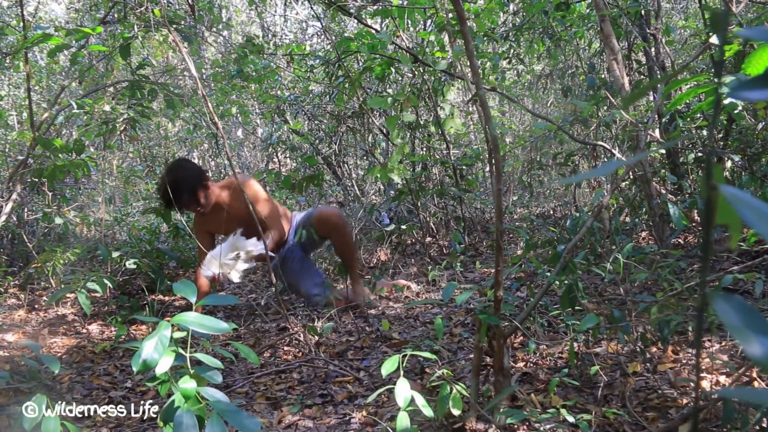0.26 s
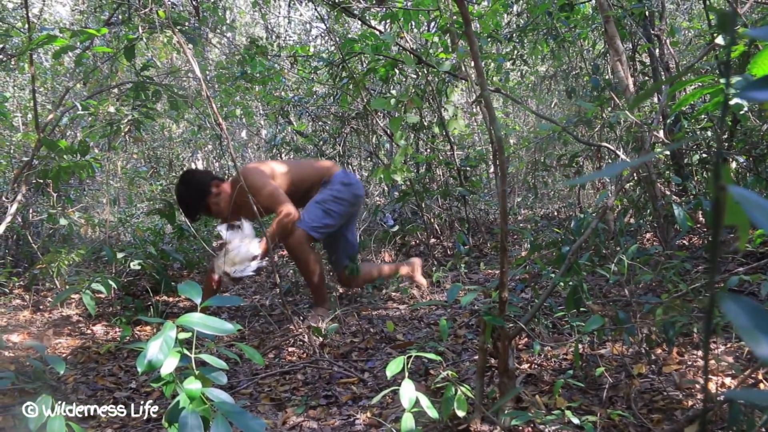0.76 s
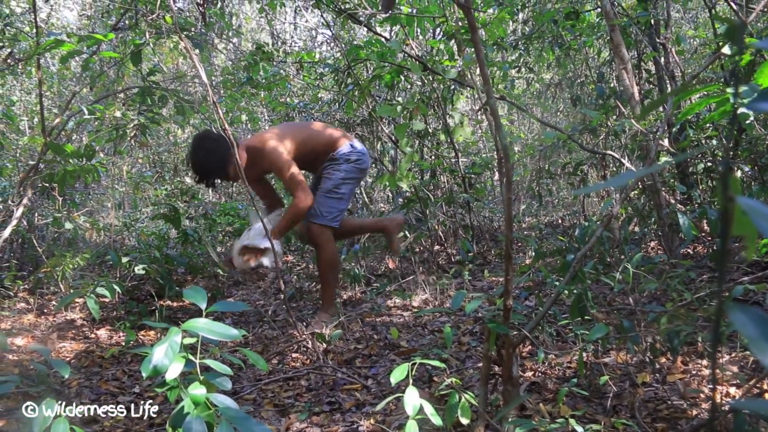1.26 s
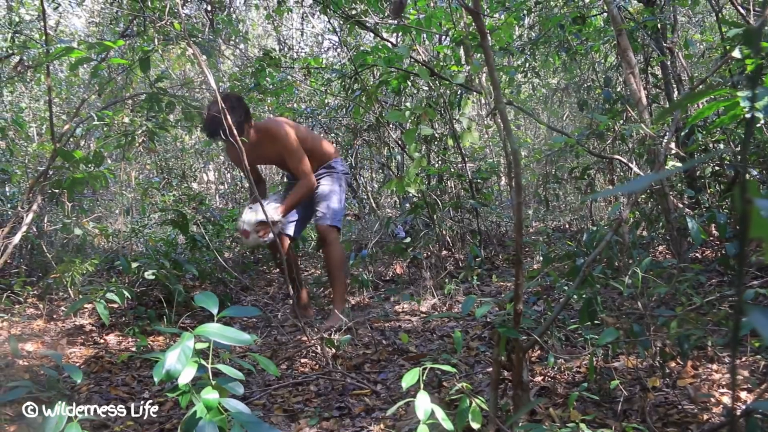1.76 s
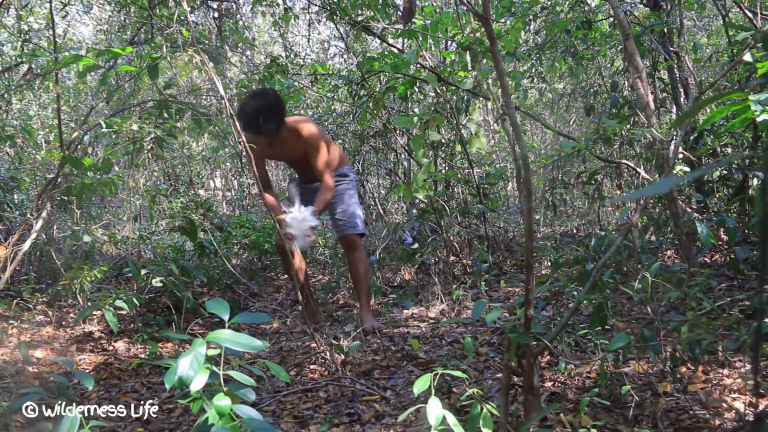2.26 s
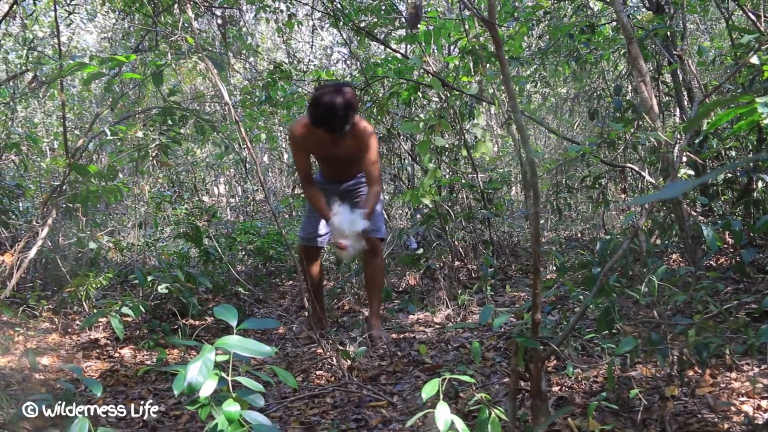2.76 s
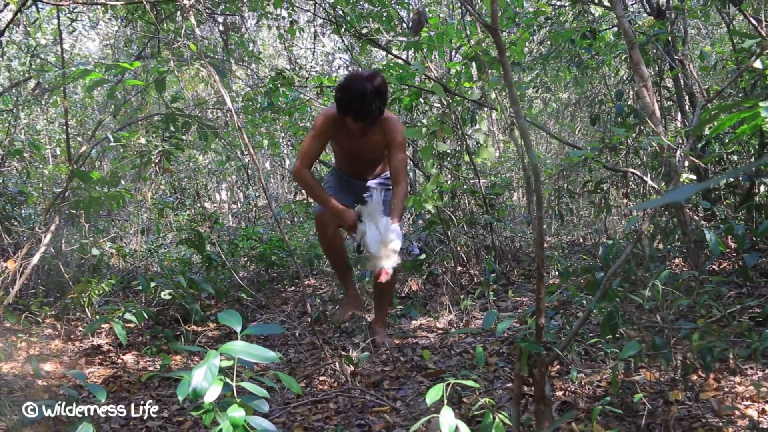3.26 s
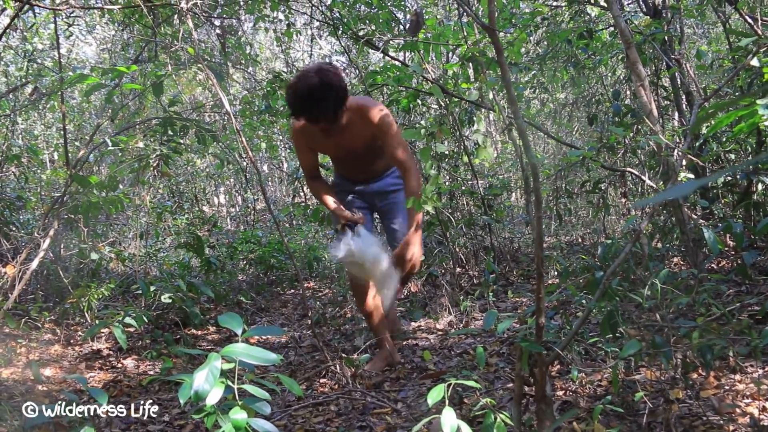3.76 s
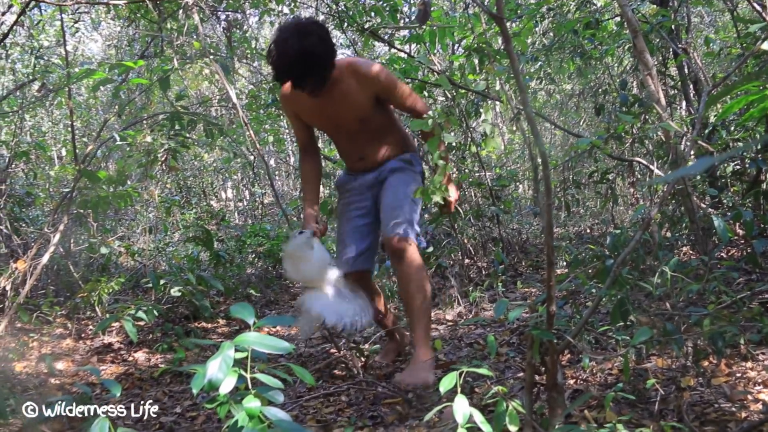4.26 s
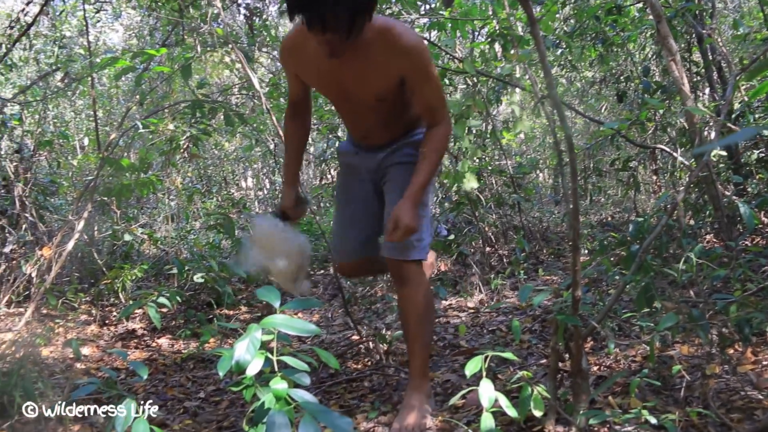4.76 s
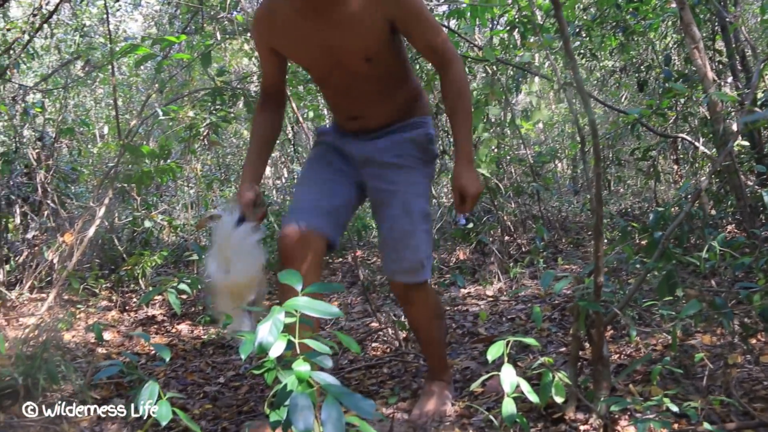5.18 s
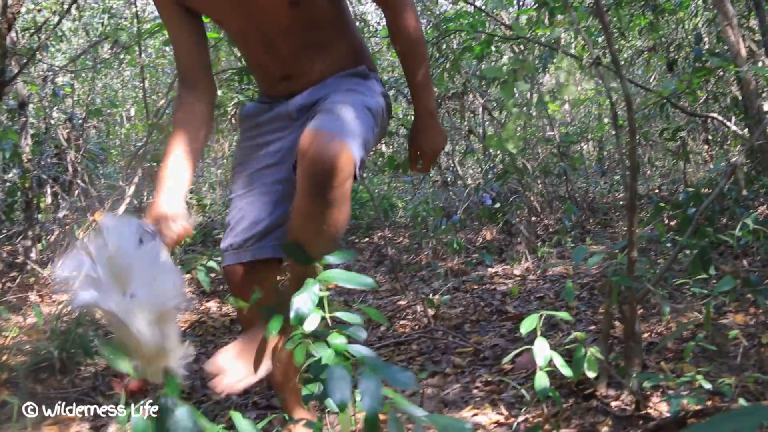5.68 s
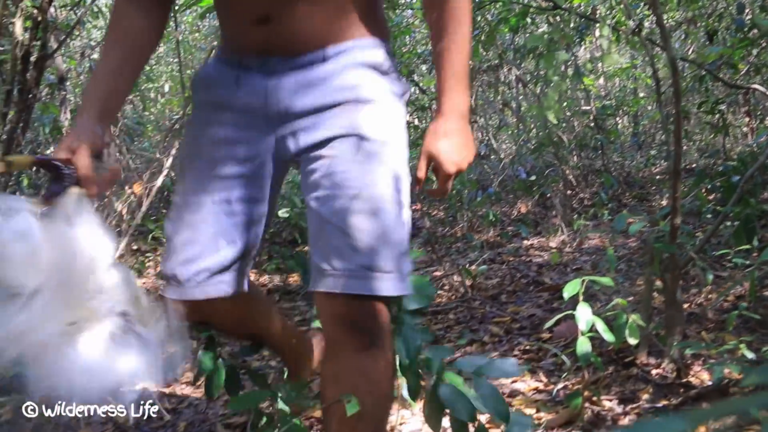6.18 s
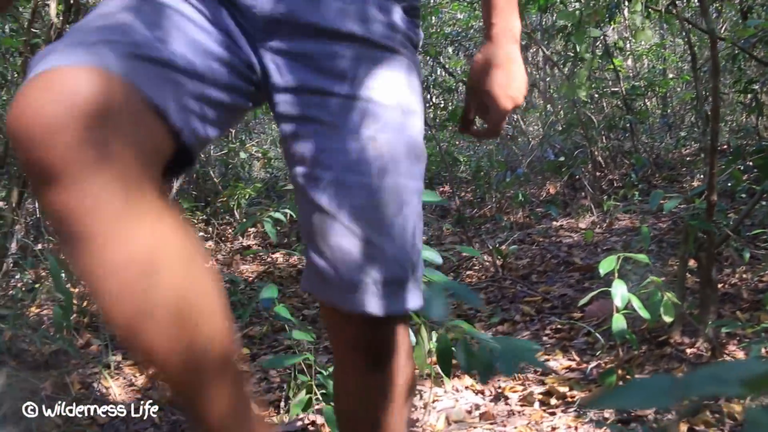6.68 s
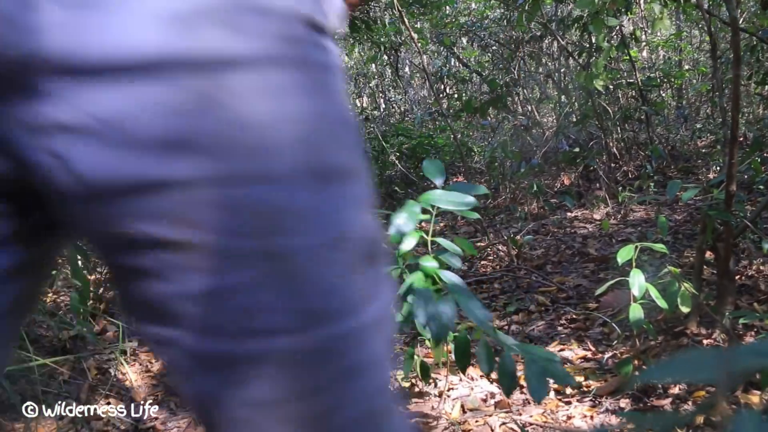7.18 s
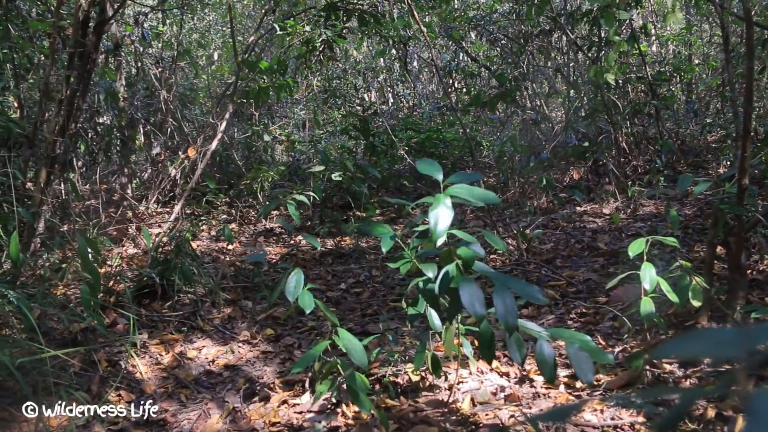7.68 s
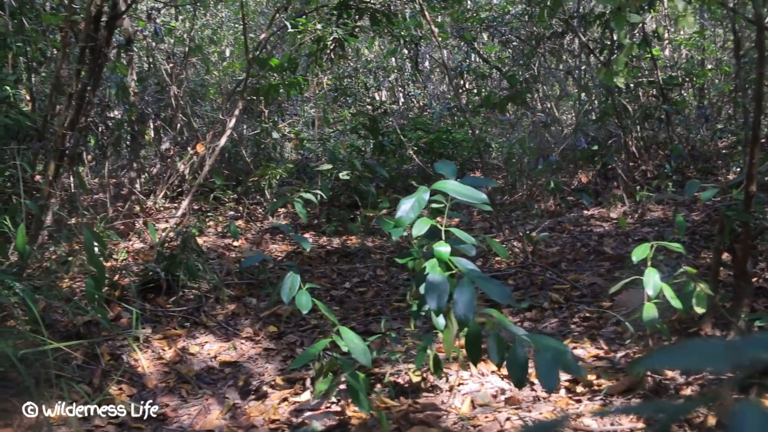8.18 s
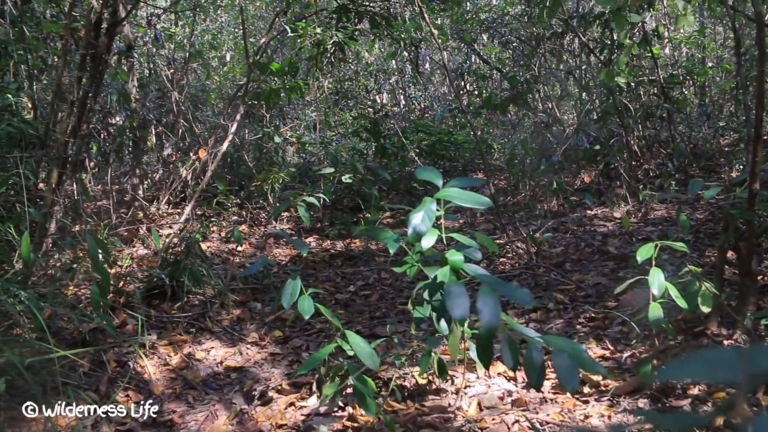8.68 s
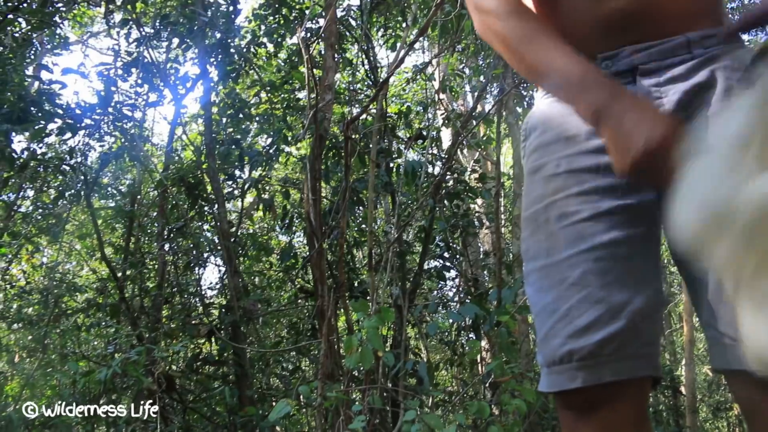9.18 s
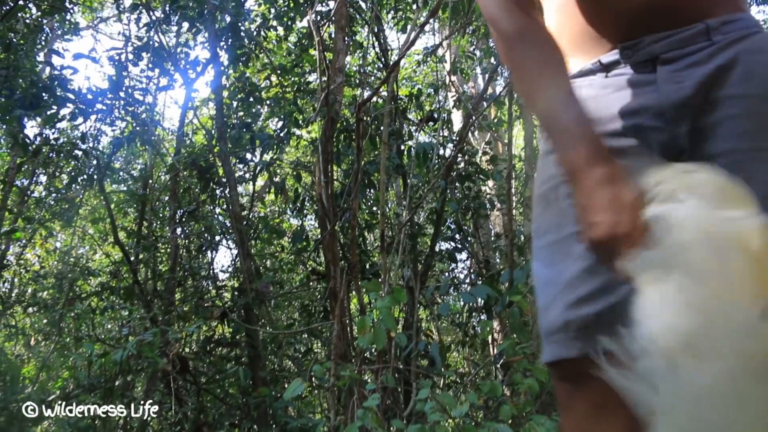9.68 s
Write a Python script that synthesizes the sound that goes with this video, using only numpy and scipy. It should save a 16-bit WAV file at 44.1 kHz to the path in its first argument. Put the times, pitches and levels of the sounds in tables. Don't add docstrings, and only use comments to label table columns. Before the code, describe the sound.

Crackling leaf litter and snapping twigs, a few faint short hen clucks, footsteps passing close, one sharp squawk, then dull thuds and quieter steps.

```python
import sys
import numpy as np
from scipy import signal
from scipy.fft import rfft, irfft, next_fast_len
from scipy.io import wavfile
from scipy.ndimage import uniform_filter1d, map_coordinates

SR = 44100
rng = np.random.default_rng(int(sys.argv[2]) if len(sys.argv) > 2 else 0)


def linear_from_db(decibels):
    return 10 ** (np.asarray(decibels, float) / 20)


def transcribe(signal):
    frames = np.atleast_2d(signal).T
    limited = np.clip(frames, -1, 1)
    pcm = np.round(limited * 32767).astype(np.int16)
    wavfile.write(sys.argv[1], SR, pcm)


N = 438354

# (start [s], length [s], peak level [dB], first pitch [Hz], last pitch [Hz])
CLUCKS = [
    (1.6085, 0.014, -30.5, 363, 355),
    (1.6765, .031, -29.5, 432, 322),
    (2.2526, 0.0375, -25.5, 372, 350),
    (3.2668, 0.04, -26.5, 448, 468),
    (4.577, .057, -24, 348, 318),
]
# (pitch arch [share], moment of peak [0-1], sag [dB],
# first beak tilt [dB/octave], last beak tilt [dB/octave])
CLUCK_MANNER = [(0, .35, 2, 2, 5), (0, .64, 5, -24, 22), (.18, .44, 2.5, 2, 2), (.025, .36, 16, -14, 16),
                (.15, .46, 7, -15, 10)]
# (time [s], pitch [Hz], level [dB], beak tilt [dB/octave])
SQUAWK = [
    (7.0075, 375, -15, 8),
    (7.014, 400, -13, 10),
    (7.0164, 430, -22, 10),
    (7.0182, 522, -8, -8),
    (7.024, 535, -5.8, -20),
    (7.037, 545, -9, -13),
    (7.046, 543, -9, 9),
    (7.0605, 518, -11, 20),
    (7.0725, 375, -26, 14),
]
# (frequency [Hz], level [dB])
THROAT = [
    [(300, -15), (750, -10), (1100, -12), (1440, 0), (1850, -16), (2550, -14), (3200, -24), (3650, -20),
     (5000, -45)],
    [(300, -21), (720, -11), (1070, -6), (1400, 4), (1560, -15), (1720, -8), (2100, -30), (3500, -45)],
    [(300, -17), (820, -1), (1250, 0), (1600, -2), (2050, 0), (2400, -10), (2850, -13), (3450, -13),
     (3950, -36), (4600, -15), (5700, -20), (7000, -38)],
    [(300, -20), (470, -12), (930, -6), (1410, 2), (1880, -13), (2350, -13), (2820, -15), (3300, -42),
     (5000, -50)],
    [(370, -26), (750, -23), (1120, 0), (1500, -18), (1800, -9), (1980, -20), (2250, -12), (2650, -2),
     (3000, -22), (3450, -16), (3800, -30), (4100, -25), (6500, -38)],
    [(380, -20), (540, -12.5), (800, -13), (1080, 0), (1250, -2), (1620, -16), (1900, -32), (2160, -23),
     (2450, -34), (2700, -36), (3240, -29), (4200, -45), (4860, -31), (5400, -52)],
]
RASP = [.25, .2, .27, .2, .17, .03]
DULLING = [1.7, 1.7, 1.7, 1.7, 1.7, .3]
HEN_PAN = [-1.7, -1, -1.5, -3.5, -1.5, -2.9]
HEN_TURN = [0, .1, .1, -.3, .35, .68]
HEN_ECHO = [-16, -13, -11.5, -16, -17.5, -15.5]
# (time [s], peak level [dB], centre frequency
# [Hz])
SNAPS = [(0.069, -31, 2600), (0.086, -28.5, 3280), (0.35, -29, 4450), (0.384, -30.5, 4570),
         (0.462, -29.5, 2000), (0.512, -27, 2700), (0.56, -36, 2010), (0.995, -30.5, 2800),
         (1.069, -33.5, 2790), (1.543, -31, 2970), (2.07, -25.5, 7540), (3.085, -32, 1540),
         (3.387, -42, 3440), (3.533, -27.5, 9000), (3.624, -22, 3510), (3.633, -32, 864),
         (3.749, -34, 4260), (4.504, -19.5, 3080), (4.525, -31.5, 790), (4.962, -51, 870),
         (5.429, -23, 6700), (5.476, -25.5, 7250), (5.645, -38.5, 8000), (5.652, -31.5, 5500),
         (5.704, -25, 855), (5.73, -28.5, 10200), (5.762, -29.5, 7130), (5.782, -29, 11020),
         (5.822, -24, 5600), (5.885, -34, 7340), (5.902, -35.5, 8000),
         (5.925, -30.5, 7560), (6.01, -36, 4000), (6.049, -20, 6300), (6.098, -23.5, 1930),
              (6.21, -36, 993), (6.83, -29, 1400), (6.762, -38.5, 2850), (6.786, -20, 2280),
              (6.808, -29.5, 800), (6.865, -29.5, 3280), (6.944, -26, 1860), (7.092, -20, 700),
              (7.149, -24, 2070), (7.183, -26, 1100), (7.208, -23, 2390), (7.276, -23.5, 4560),
              (7.276, -27.5, 800), (7.45, -36.5, 2140), (7.471, -25, 1800), (7.655, -22, 2530),
              (7.88, -23.5, 2570), (7.983, -23.5, 2400), (8.045, -33.5, 1200), (8.107, -25, 4670),
              (8.143, -31.5, 1700), (8.676, -30, 2300), (8.455, -31, 2890), (8.977, -37, 1324),
              (9.184, -31, 1700), (9.238, -29.5, 1340), (9.381, -34.5, 1900), (9.725, -39, 1500),
              (9.75, -41, 1850), (9.815, -36, 1900), (9.839, -32, 1790), (9.924, -43, 2800),
         (3.501, -38.5, 2770), (3.635, -24.5, 3200), (3.689, -34, 3000), (3.841, -43.5, 4770),
         (3.923, -40, 2090), (4.028, -37, 1650), (4.137, -37.5, 2680), (4.211, -34, 2550),
         (4.295, -34.5, 4840), (4.323, -35.5, 4990), (4.348, -38, 2220), (4.373, -33, 5390),
         (4.419, -31, 3420), (4.558, -32, 3420), (4.812, -39.5, 5500), (4.851, -38, 4390),
         (4.941, -34.5, 4130), (5.291, -35, 4060), (5.31, -33.5, 5240), (5.515, -37, 2140),
         (5.949, -35, 4780), (6.15, -29, 4000), (6.197, -33.5, 2600), (6.372, -37, 3310),
         (6.41, -35.5, 4000), (6.441, -39, 2100), (6.494, -35, 3240), (6.516, -36.5, 2910),
         (6.668, -31.5, 2100), (6.723, -37, 4550), (6.731, -37, 4600), (6.787, -26, 4490),
         (7.093, -19, 6700), (7.108, -19, 5500), (7.151, -24.5, 4500), (7.211, -23.5, 4000),
              (7.39, -39, 3810), (7.431, -36, 5060), (7.494, -33.5, 2230), (7.551, -35.5, 8980),
              (7.571, -33.5, 1500), (7.711, -34, 2520), (7.73, -31.5, 4520), (7.743, -28, 4090),
              (7.778, -21, 4550), (7.819, -29, 2760), (7.936, -36, 2870), (8.045, -29, 6000),
              (8.075, -30, 6420), (8.152, -26, 5700), (8.252, -33.5, 4510), (8.281, -32, 2240),
              (8.416, -39, 2110), (8.835, -30.5, 5000)]
# (time [s], peak level [dB],
# frequency [Hz], rise [s], crunch level [dB])
THUDS = [(4.163, -50.5, 310, 0.0047, -2), (4.219, -46, 180, 0.0025, 2.5), (4.954, -51.5, 162, 0.0083, 2),
         (5.699, -36.5, 180, 0.0028, -16), (6.285, -40.5, 503, 0.0037, -10), (6.589, -52, 420, 0.0052, 5),
         (8.006, -36, 264, 0.0033, -3.5), (8.176, -25, 287, 0.0038, -6.5), (8.268, -34.5, 410, 0.0038, -14),
         (8.375, -38.5, 437, 0.0051, -4.5), (8.521, -47.5, 436, 0.0066, 1), (8.557, -40, 433, 0.0046, -3),
         (8.719, -40.5, 786, 0.0034, -1.5), (8.752, -37, 428, 0.0025, -10), (9.237, -27.5, 201, 0.002, -12),
         (9.864, -31.5, 258, 0.0018, -11),
         (1.589, -46, 517, 0.0021, -8), (1.785, -40, 1014, 0.0035, -28), (2.071, -41.5, 920, 0.0031, -21),
        (2.73, -52, 1000, .004, -25), (4.793, -50, 860, 0.0047, -2.5), (4.846, -43.5, 740, 0.0018, -7.5),
        (6.787, -18, 732, 0.0013, -15), (7.399, -39, 880, 0.0025, -11), (8.634, -38, 1050, 0.0022, -27),
        (9.059, -50, 603, 0.0026, -11),
         (.202, -49, 412, 0.0037, -4), (4.414, -45, 476, 0.0037, -5), (4.23, -44, 804, .004, -17),
           (4.53, -46, 200, .004, -9), (4.7, -46.5, 595, .004, -5), (4.8, -52.5, 180, 0.0064, -3),
           (5.617, -50, 207, 0.0038, -4), (5.99, -49, 447, 0.0042, -11), (6.5, -48.5, 170, 0.0057, -0.5),
           (6.786, -34.5, 227, 0.0026, -21), (6.808, -40, 220, .0025, -15), (6.79, -33.5, 422, 0.0019, -20),
           (7.449, -53, 161, 0.0036, -4), (7.075, -42, 90, .01, -20), (8.0, -44, 75, .012, -20),
           (8.012, -37, 950, .002, -11), (8.013, -34, 260, 0.0027, -12), (8.108, -43, 546, 0.0029, -8),
           (8.179, -26, 560, 0.0017, -14), (8.197, -37.5, 344, 0.0065, -7.5), (8.22, -43, 417, 0.0045, -9),
           (8.448, -44.5, 650, 0.0032, -5)]
# (time [s], strength [dB], rise [s per 10 dB], fall [s per 10 dB])
PRESSES = [(.08, -38, 0.11, 0.073), (.21, -40.5, 0.05, 0.15), (0.499, -36.5, 0.066, 0.16),
           (.66, -39.5, 0.14, 0.037), (.9, -43.5, 0.067, 0.32), (1.0, -45, 0.19, 0.18), (.76, -63, .2, .2),
           (1.3, -52.5, 0.16, 0.24), (1.612, -38, 0.033, 0.049), (1.831, -40.5, 0.076, 0.16),
           (2.086, -39, 0.019, 0.063), (2.265, -50.5, 0.037, 0.12), (2.439, -45, 0.034, 0.1),
           (2.584, -50.5, 0.041, 0.049), (2.863, -52, 0.1, 0.18), (3.091, -53.5, 0.042, 0.17),
           (3.273, -54, 0.061, 0.11), (3.397, -52, 0.015, 0.026), (3.57, -39, 0.023, 0.17),
           (3.65, -40, 0.18, 0.064), (3.9, -55, 0.12, 0.34), (4.061, -45, 0.03, 0.084),
           (4.22, -42.5, 0.083, 0.07), (4.43, -37, 0.071, 0.17), (4.59, -29, 0.0064, 0.01),
           (4.75, -51, 0.59, 0.29), (4.962, -49.5, 0.052, 0.054)]
# (time [s], strength [dB], rise [s per 10 dB], fall [s per 10 dB])
PASSING_STEPS = [(5.33, -38.5, 0.026, 0.15), (5.44, -38, 0.09, 0.03), (5.732, -49, 0.11, 0.13),
                 (5.927, -49, 0.26, 0.034), (6.055, -36.5, 0.019, 0.16), (6.211, -41.5, 0.23, 0.038),
                 (6.4, -53, 0.23, 0.41), (6.55, -50.5, 0.21, 0.44), (6.795, -44.5, 0.15, 0.26),
                 (6.894, -51, .1, 0.27), (7.009, -39, 0.072, 0.15), (7.1, -27, 0.034, 0.076),
                 (7.15, -36.5, .03, .05), (7.21, -40, .03, .04), (7.27, -43.5, 0.11, 0.024),
                 (7.453, -50.5, 0.047, 0.23), (7.538, -58, 0.12, .15), (7.658, -42.5, 0.18, 0.13),
                 (7.798, -33.5, 0.041, 0.074), (7.987, -43, 0.068, 0.089), (8.122, -39.5, 0.059, 0.16),
                 (8.296, -38.5, 0.036, 0.03), (8.556, -48, 0.41, 0.095), (8.735, -43, 0.12, 0.086),
                 (8.852, -37.5, 0.036, 0.051), (8.986, -41, 0.0096, 0.0043), (9.06, -55.5, 0.083, 0.4),
                 (9.194, -51, 0.094, 0.12), (9.394, -56, 0.044, 0.13), (9.733, -63, 0.028, 0.29),
                 (9.937, -47, 0.23, .3)]
# (time [s], level [dB])
NEARNESS = [(0, -16), (4, -13), (7, -7), (8.3, -5), (8.9, -5), (9, -2), (9.94, -1)]
# (frequency [Hz], density [dB per Hz])
CRISP = [(2470, -32.5), (4200, -8.5), (7110, -3.5), (8500, -5.5), (9720, -6), (15100, -12.5), (16000, -39)]
# (frequency [Hz], density [dB per Hz])
MIDDLE = [(880, -28.5), (1500, -10), (1820, -10.5), (2070, -1.5), (2370, -5.5), (2680, -0.5), (3050, -6),
          (3310, -3), (3660, -5), (5000, -5.5), (6500, -12.5), (11000, -120)]
# (frequency [Hz], density [dB per Hz])
DULL = [(88, -28.5), (150, -14.5), (293, -16), (518, -1.5), (641, -5), (870, 0.5), (1080, -4), (1370, -4.5),
        (1700, -7.5), (2210, -32), (3740, -120)]
# (frequency [Hz], density [dB per Hz])
BODY = [(60, -15.5), (130, -5.5), (280, -0.5), (480, -6), (900, -26.5)]
# (level over the crisp ones at a usual step [dB], growth [dB/dB], nearness share)
MIDDLE_LAW = (0.13, 0.94, 0.094)
# (level over the crisp ones at a usual step [dB], growth [dB/dB], nearness share)
DULL_LAW = (-3, 0.66, 0.36)
# (frequency [Hz], share reflected)
BOUNCE = [(300, 0), (700, 0.22), (3500, 0.24), (6000, 0.028), (9000, 0.0096)]
BOUNCE_FADES_S = (5.5, 7)
# (frequency [Hz], t60 [s])
TREES = [(300, 0.089), (900, 0.22), (1600, 0.45), (3000, 0.19), (10000, 0.16)]
# (frequency [Hz], density [dB per Hz])
HUSH = [(15, -39.5), (25, -39), (44, 0), (123, 3.5), (363, -2), (911, -3), (988, 1.5), (1290, -19.5),
        (2050, -3.5), (2550, -8), (7710, -12), (14800, -17.5), (16000, -8)]
# (frequency [Hz], correlation)
ALIKE = [(60, 0.9), (130, 0.93), (290, 0.74), (640, 0.84), (1410, 0.6), (3100, 0.39), (6820, -0.12),
         (15000, -0.088)]
# (time [s], level [dB])
SCENE_CHANGE = [
    (8.867, 0),
    (8.869, -16),
    (8.878, -34),
    (8.892, -42),
    (8.895, -120),
    (8.921, -120),
    (8.923, 0),
]


def hen():
    rasp_per_db = .017
    waver_db = 3.3
    k = np.arange(1, 19)[:, None]
    out, far = np.zeros((2, 2, N + SR))
    calls = [cluck(*row, *manner) for row, manner in zip(CLUCKS, CLUCK_MANNER)] + [SQUAWK]
    settings = zip(calls, RASP, DULLING, THROAT, HEN_PAN, HEN_TURN, HEN_ECHO)
    for rows, hoarse, dulling, throat, pan_db, turn, echo_db in settings:
        t = np.arange(rows[0][0], rows[-1][0], 1 / SR)
        size = len(t)
        pitch, db, tilt = curves(rows, t)
        rasp = hoarse + rasp_per_db * (db.max() - db)
        phase = 2 * np.pi * np.cumsum(pitch * (1 + 0.068 * rasp * wobble(360, size))) / SR
        hz = k * pitch

        fade = np.clip((3800 - hz) / 1300, .5, 1)
        gain = linear_from_db(along(throat, hz) + tilt * np.clip(np.log2(hz / 1100), 0, .6) * fade)
        gain = gain * linear_from_db(dulling * (db - db.max()) * np.clip(np.log2(hz / 2000), 0, 1))
        waver = np.array([wobble(80, size) for _ in k])
        gain = gain * linear_from_db(waver_db * waver * (hz > 1900))
        gain = gain / np.sqrt(np.sum(gain ** 2, axis=0) / 2)

        flutter = np.array([wobble(449, size) for _ in range(2 * len(k))]).reshape(2, len(k), -1)
        flutter = flutter * np.minimum(.65 * (gain.max(axis=0) / gain) ** .36, 2.6)
        flutter = flutter * np.clip(hz / 1300, .3, 1)

        lag = np.pi / 2 - .12 * k ** 2 - np.cumsum(rng.uniform(0, .4, k.shape), axis=0)
        port_lag = np.reshape([0, turn], (2, 1, 1)) * np.minimum(hz / 1000, 1) ** 2
        angle = k * phase + lag - port_lag
        tone = (1 + 1.2 * rasp * flutter[0]) * np.cos(angle) + 1.1 * rasp * flutter[1] * np.sin(angle)
        edges = np.minimum(np.minimum(t - t[0], t[-1] - t) / .002, 1)
        call = linear_from_db(db) * np.sum(gain * tone, axis=1) * edges
        add(out, t[0], call, pan_db)
        swaying = .8 + .6 * wobble(250, size)
        add(far, t[0], linear_from_db(echo_db) * call[0] * swaying, 0)
    near = signal.lfilter(*signal.butter(2, 230, "high", fs=SR), out[:, :N])
    far = signal.lfilter(*signal.butter(2, [1200, 1950], "band", fs=SR), far[:, :N])
    return near, far


def cluck(s, length, db, first_hz, last_hz, arch, top, sag_db, shut, wide):
    attack_s, release_s, edge_db = .002, .009, 20
    onset_db, muffle = 3, .27
    u = np.array([0, attack_s / length, top, 1 - min(release_s / length, .3), 1])
    effort = np.interp(u, [0, top, 1], [0, 1, 0])
    pitch = (first_hz + (last_hz - first_hz) * u) * (1 + arch * effort)
    level = db - np.array([edge_db, onset_db - muffle * shut, 0, sag_db, edge_db])
    return np.transpose([s + length * u, pitch, level, shut + (wide - shut) * u])


def snaps():
    out = np.zeros((2, N + SR))
    for s, db, hz in SNAPS:
        t60 = .024 * linear_from_db(rng.normal(0, 1.5))
        treble_db = db - 1.5 + 5 * min(np.log2(hz / 3500), 0)
        add(out, s, linear_from_db(db - 1.0) * knock(hz, t60, width=0.43), -1.5)
        broad = np.array([knock(max(hz, 6500), .9 * t60, width=1.4) for port in out])
        add(out, s, linear_from_db(treble_db) * broad, -1.2)
    return out[:, :N]


def knock(hz, t60, width):
    t = np.arange(SR // 10) / SR
    burst = rng.standard_normal(len(t)) * linear_from_db(-60 * t / t60) * (1 - np.exp(-t / .0006))
    burst[SR // 2000] += 2.2
    b, a = signal.iirpeak(min(hz, 15000), 1 / width, SR)
    burst = signal.lfilter(b, a, burst)
    return burst / np.max(np.abs(burst))


def thuds():
    out = np.zeros((2, N + SR))
    t = np.arange(SR // 10) / SR
    for s, db, hz, rise, crunch_db in THUDS:
        swell = t / rise * np.exp(1 - t / rise)
        push = np.sin(2 * np.pi * hz * (t - rise) + rng.uniform(0, 7.8))
        grains = linear_from_db(6.4 * wobble(400, size=len(t))) * rng.standard_normal(len(t))
        crunch = unit(signal.lfilter(*signal.butter(2, [0.39 * hz, 1500], "band", fs=SR), grains))
        add(out, s, linear_from_db(db) * (swell * push + linear_from_db(crunch_db + 3.0) * swell ** .5 * crunch), -1.2)
    return signal.lfilter(*signal.butter(2, 55, "high", fs=SR), out[:, :N])


def litter():
    usual_db, body_db = -45.5, -2.5
    t = np.arange(N) / SR
    crisp_db = np.interp(t, t[::32], pressing(t[::32]))
    near_db = curves(NEARNESS, t)[0]
    middle_db, dull_db = [usual_db + db + grows * (crisp_db - usual_db) + share * near_db
                          for db, grows, share in (MIDDLE_LAW, DULL_LAW)]
    clumps = linear_from_db(.7 * wobble(35) + 1.2 * wobble(90) + 1.25 * wobble(260))
    sizes = linear_from_db(1.9 * np.minimum(rng.exponential(size=N), 5))
    cracks = sizes * (rng.random(N) < .4)
    layers = [(crisp_db, CRISP, 2.5), (middle_db, MIDDLE, 3), (dull_db, DULL, 3),
              (dull_db + near_db + body_db, BODY, 3.5)]
    out = 0
    for db, spectrum, depth_db in layers:
        pair = patchy(clumps * cracks * rng.standard_normal((2, N)), depth_db)
        out = out + linear_from_db(db) * spread(pair, spectrum)
    return out


def pressing(t):
    power = linear_from_db(2 * -85)
    for s, db, rise, fall in PRESSES + PASSING_STEPS:
        distance = np.where(t < s, (s - t) / max(rise, .005), (t - s) / max(fall, .005))
        power = power + linear_from_db(2 * db - 20 * distance)
    return 10 * np.log10(power)


def patchy(x, depth_db):
    z = signal.stft(x, nperseg=256)[2]
    field = uniform_filter1d(rng.standard_normal(z.shape[1:]), size=3, axis=0)
    field = uniform_filter1d(field, size=8, axis=1)
    return signal.istft(z * linear_from_db(depth_db * unit(field)), nperseg=256)[1][:, :N]


def bounced(x):
    delay_s = .00166
    m = next_fast_len(N + 1024)
    hz = np.fft.rfftfreq(m, 1 / SR)
    share = np.clip(along(BOUNCE, hz), 0, .8)
    response = (1 - share * np.exp(-2j * np.pi * hz * delay_s)) / np.sqrt(1 + share ** 2)
    comb = irfft(rfft(x, m) * response, m)[:, :N]
    return x + np.interp(np.arange(N) / SR, BOUNCE_FADES_S, [1, .25]) * (comb - x)


def trees(x):
    hz, t, z = signal.stft(rng.standard_normal((2, SR // 2)), SR, nperseg=256)
    tail = signal.istft(z * linear_from_db(-60 * t / along(TREES, hz)[:, None]), SR, nperseg=256)[1]
    late = np.pad(x, ((0, 0), (300, 0)))
    return signal.fftconvolve(late, tail / np.linalg.norm(tail[0]), axes=1)[:, :N]


def hush():
    return linear_from_db(-54.5) * spread(rng.standard_normal((2, N)), HUSH)


def spread(pair, spectrum):
    m = next_fast_len(N + 8192)
    hz = np.fft.rfftfreq(m, 1 / SR)
    turn = np.arccos(np.clip(along(ALIKE, hz), -1, 1)) / 2
    coloured = rfft(pair, m) * linear_from_db(along(spectrum, hz))
    mid, side = irfft(coloured * [np.cos(turn), np.sin(turn)], m)[:, :N]
    return unit(np.array([mid + side, mid - side]))


def unit(x):
    return x / np.sqrt(np.mean(x ** 2) + 1e-20)


def along(points, hz):
    f, v = np.transpose(points)
    return np.interp(np.log(hz + 1), np.log(f + 1), v)


def curves(rows, t):
    s, *cols = np.transpose(rows)
    return [np.interp(t, s, c) for c in cols]


def wobble(rate, size=N):
    knots = rng.standard_normal(int(size * rate / SR) + 4)
    return map_coordinates(knots, [np.arange(size) * rate / SR])


def add(track, s, sound, pan_db):
    track[:, round(s * SR):][:, :sound.shape[-1]] += sound * linear_from_db([[pan_db / 2], [-pan_db / 2]])


def scene():
    bird, far = hen()
    hits = bounced(snaps()) + thuds()
    ground = (bounced(litter()) + hush()) * linear_from_db([[-.6], [.6]])
    return bird + hits + trees(far + linear_from_db(-8.0) * hits) + ground


def band_limit(x):
    return signal.sosfilt(signal.butter(12, 16050, fs=SR, output="sos"), x)


def record(dry):
    cut = dry * linear_from_db(curves(SCENE_CHANGE, np.arange(N) / SR)[0])
    m = next_fast_len(N)
    passed = np.fft.rfftfreq(m, 1 / SR) < 15990
    mix = irfft(rfft(cut, m) * passed, m)[:, :N]
    return band_limit(mix)


dry = scene()
out = record(dry)
transcribe(out)
```